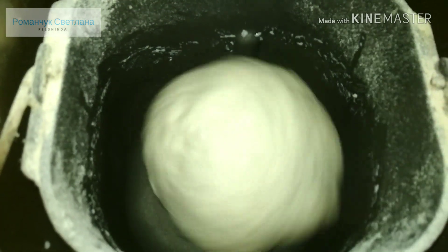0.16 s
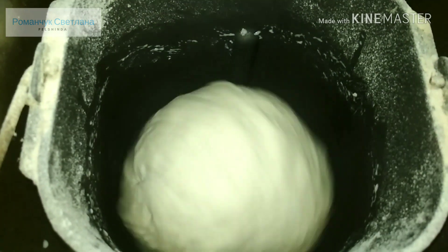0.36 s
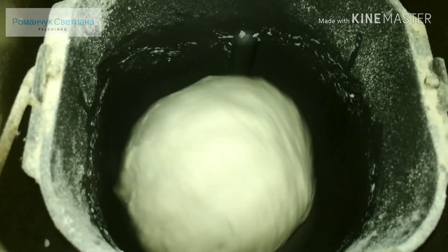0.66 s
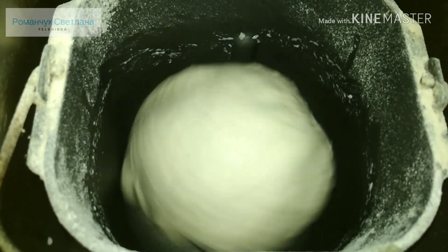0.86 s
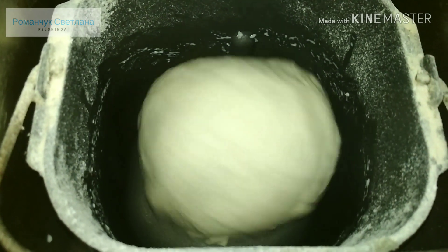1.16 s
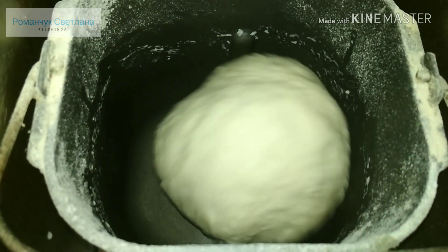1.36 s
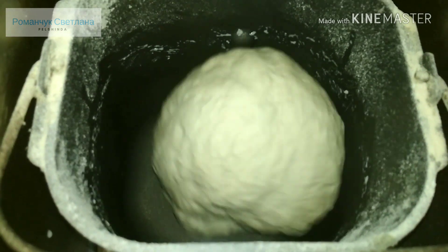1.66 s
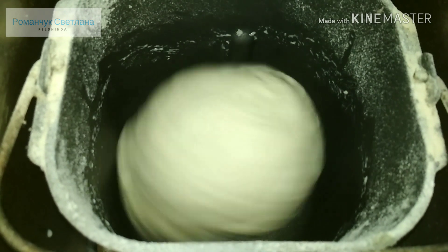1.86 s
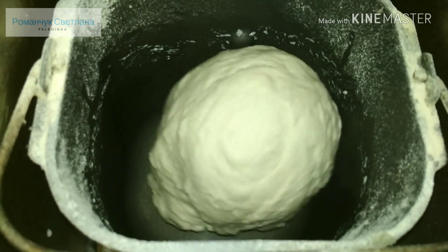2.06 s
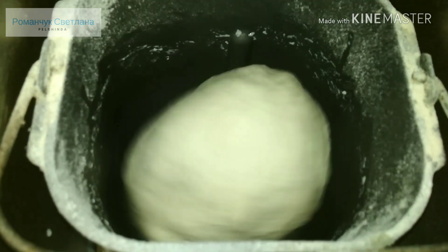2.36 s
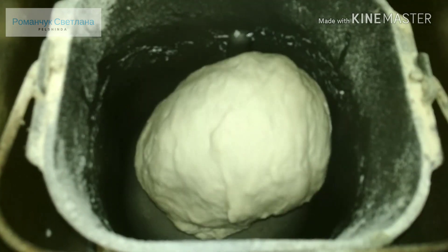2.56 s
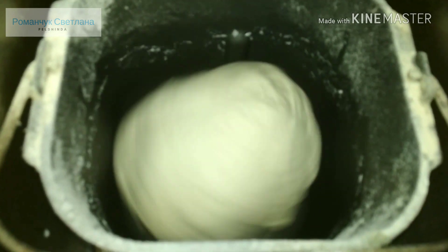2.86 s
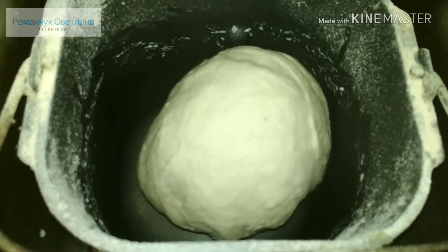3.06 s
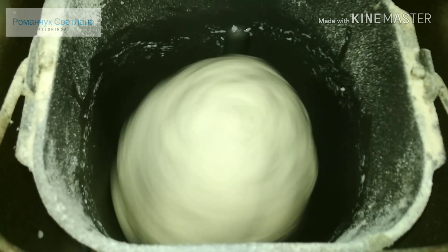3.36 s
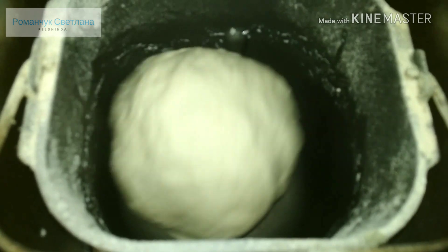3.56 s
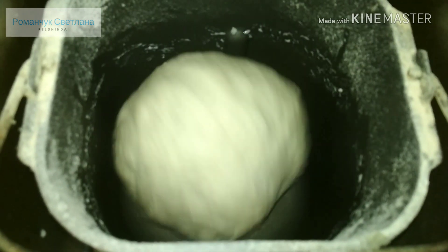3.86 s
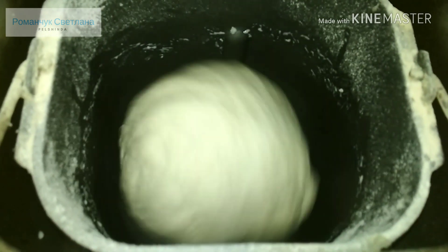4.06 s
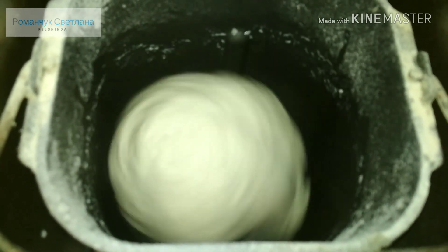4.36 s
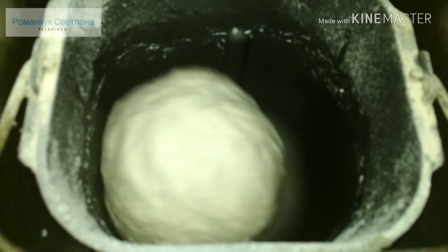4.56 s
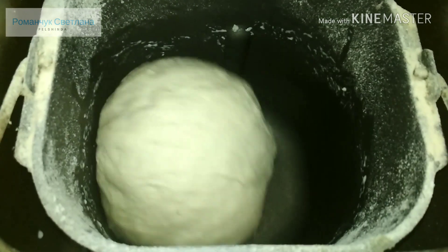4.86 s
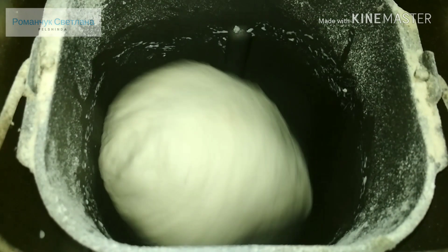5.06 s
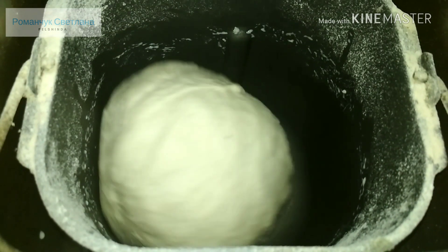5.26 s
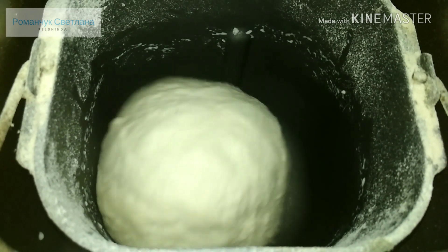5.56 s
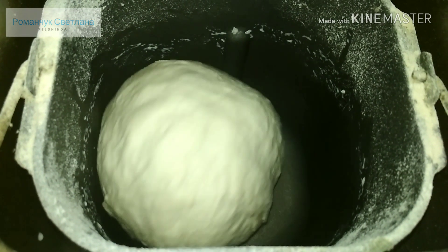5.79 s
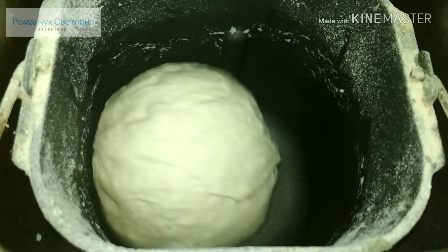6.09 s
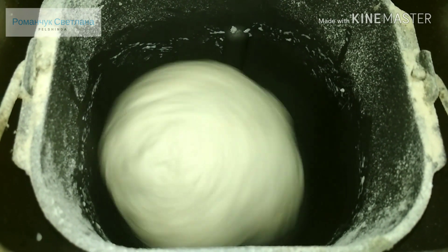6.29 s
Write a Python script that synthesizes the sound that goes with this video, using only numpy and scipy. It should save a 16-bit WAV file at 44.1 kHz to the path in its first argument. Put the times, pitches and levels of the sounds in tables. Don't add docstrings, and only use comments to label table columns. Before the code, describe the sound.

Close stereo microphones look down into a small metal pan. A motor hums low, swelling and sagging unevenly as the paddle loads it, while the casing rattles. Soft booming thuds, hollow knocks, gritty rubbing and sticky hiss follow the turning dough. Bright clicks burst out early and again midway; later the motor labours more regularly, with brief slips and small squelches.

```python
import sys
import numpy as np
from scipy import signal
from scipy.io import wavfile
from scipy.ndimage import uniform_filter1d

SR = 44100
rng = np.random.default_rng(int(sys.argv[2]) if len(sys.argv) > 2 else 0)


def generate_wav(signal):
    frames = np.transpose(np.atleast_2d(signal))
    scaled = np.clip(frames, -1, 1) * 32767
    pcm = np.round(scaled).astype(np.int16)
    wavfile.write(sys.argv[1], SR, pcm)


def convert_level_to_amplitude(level_db):
    exponent = np.asarray(level_db, float) / 20
    return 10 ** exponent


N = 283563
COARSE = 100
HUM_HZ = 100
SIDES = np.array([[1], [-1]])


def unit(x):
    return x / np.sqrt(np.mean(x ** 2) + 1e-20)


def at_hz(points, hz):
    point_hz, value = np.array(points)[:, 0], np.array(points)[:, 1]
    return np.interp(np.log(hz), np.log(np.maximum(point_hz, 1)), value)


def time_since(s):
    return np.arange(N // COARSE + 2)[:, None] * COARSE / SR - s


def at_samples(coarse):
    return np.interp(np.arange(N), np.arange(len(coarse)) * COARSE, coarse)


def drift(rate_hz):
    r = np.exp(-80 * np.pi * rate_hz / SR)
    noise = rng.standard_normal(N // 40 + 2002)
    slow = signal.lfilter([1], [1, -2 * r, r * r], noise)[2000:]
    return np.interp(np.arange(N) / 40, np.arange(len(slow)), unit(slow))


def resonance(x, hz, width_hz):
    r = np.exp(-np.pi * width_hz / SR)
    poles = [1, -2 * r * np.cos(2 * np.pi * hz / SR), r * r]
    return signal.lfilter(np.array([1, 0, -1]) * (1 - r * r) / 2, poles, x)


def bell(since, rise, linger):
    return np.exp(-.5 * (since / (rise * np.where(since < 0, 1, linger))) ** 2)


def contact_db(start, hold, db, rise_db, fall_db, rest_db):
    since = time_since(start)
    each = db - rise_db * np.maximum(-since, 0) - fall_db * np.maximum(since - hold, 0)
    return at_samples(10 * np.log10(np.sum(convert_level_to_amplitude(2 * each), axis=1) + convert_level_to_amplitude(2 * rest_db)))


def add(out, sound, s):
    i = round(s * SR)
    out[:, i:i + sound.shape[1]] += sound[:, :N - i]


def grains(per_s, spread_db):
    sizes = convert_level_to_amplitude(spread_db * np.minimum(rng.exponential(1, (2, 2, N)), 4))
    sizes = sizes * rng.standard_normal((2, 2, N))
    return unit(sizes * (rng.random((2, 2, N)) < per_s / SR))


# frequency in Hz, left over right in dB.
LEAN = [(60, 1), (200, .6), (400, -1.2), (1400, -2.5), (2800, 4.5), (5500, 3), (9000, -1.2), (15000, -2)]


def leaning(hz):
    return convert_level_to_amplitude(at_hz(LEAN, hz) / 2 * SIDES)


# frequency in Hz, left-right likeness (0 to 1).
LIKENESS = [(60, .9), (380, .96), (700, .85), (1300, .9), (2400, .55), (15000, .5)]


def coloured(source, spectrum, patchy_db, shared_db):
    out, together = 0, drift(23.0)[::COARSE]
    octaves = np.log2(spectrum[-1][0] / spectrum[0][0])
    edges = spectrum[0][0] * 2 ** np.arange(0, octaves + .01, 1 / 4)
    for k, (low, high) in enumerate(zip(edges, edges[1:])):
        hz, flicker = np.sqrt(low * high), drift(6.8)[::COARSE]
        band_db = at_hz(spectrum, hz)
        if band_db < -45:
            continue
        band = signal.butter(2, [low, high], "band", fs=SR, output="sos")
        mid, side = signal.sosfilt(band, source[k % 2])
        alike = at_hz(LIKENESS, hz)
        gain = at_samples(convert_level_to_amplitude(band_db + shared_db * together + patchy_db * flicker))
        pair = np.sqrt(1 + alike) * mid + np.sqrt(1 - alike) * side * SIDES
        out = out + gain * leaning(hz) * pair
    return unit(out)


# frequency in Hz, level in dB per Hz.
FLOOR = [(650, -56), (1100, -20), (1630, -2), (2060, -16), (5490, -21), (6720, -16.5), (7240, -5),
         (14000, -27.5)]


def drive_hiss():
    noise = rng.standard_normal((2, 2, N))
    return convert_level_to_amplitude(-67) * coloured(noise, FLOOR, patchy_db=0.1, shared_db=3.0)


# peak in seconds, rise in seconds, hum in dB, groan in dB.
LOAD = [(0.147, 0.042, -40, -71), (0.308, 0.044, -43, -32), (0.446, 0.041, -37.5, -68),
        (0.574, 0.033, -37, -33), (0.723, 0.028, -36, -42), (0.883, 0.041, -38.5, -33),
        (1.006, 0.036, -42, -62), (1.109, 0.07, -44.5, -42), (1.369, 0.058, -39, -44),
        (1.47, 0.036, -61, -69), (1.665, 0.051, -38.5, -48), (1.79, 0.055, -47, -35.5),
        (2.085, 0.046, -36.5, -43), (2.523, 0.043, -41, -37.5), (3.068, 0.033, -38, -66),
        (3.608, 0.044, -38, -34.5), (3.94, 0.054, -39.5, -34.5), (4.092, 0.051, -47, -60),
        (4.237, 0.039, -40.5, -33), (4.354, 0.035, -44, -57), (4.557, 0.042, -37, -31.5),
        (4.892, 0.041, -36, -32.5), (5.199, 0.034, -34.5, -31.5), (5.538, 0.035, -37, -32.5),
        (5.642, 0.018, -40, -71), (5.86, 0.051, -38.5, -31.5), (6.129, 0.042, -39, -32.5),
        (6.424, 0.011, -37, -69)]


def heaves():
    s, rise, hum_db, _ = np.transpose(LOAD)
    return np.sum(convert_level_to_amplitude(hum_db) * bell(time_since(s), rise, linger=1.46), axis=1)


# start in seconds, hold in seconds, housing rattle in dB, pan rub in dB.
KNEAD = [(0.04, 0.2, -46, -53.5), (0.316, 0.2, -47, -53.5), (0.586, 0.082, -44.5, -52.5),
         (0.717, 0.064, -41, -47.5), (0.86, 0.045, -48, -49), (0.99, 0.11, -45, -54),
         (1.272, 0.012, -45, -51.5), (1.334, 0.062, -43, -51), (1.606, 0.057, -45, -54),
         (1.722, 0.11, -45.5, -55.5), (1.964, 0.035, -46.5, -53), (2.096, 0.04, -43.5, -53),
         (2.419, 0.042, -48.5, -51.5), (2.527, 0.0068, -44, -52), (2.648, 0.014, -47, -62),
         (2.976, 0.18, -46, -53), (3.487, 0.1, -43.5, -51.5), (3.713, 0.008, -43, -53),
         (3.797, 0.085, -49.5, -52), (4.01, 0.18, -43.5, -53), (4.31, 0.0044, -46, -47.5),
         (4.347, 0.26, -49, -55.5), (4.713, 0.077, -44.5, -50.5), (4.843, 0.081, -44, -51.5),
         (5.033, 0.23, -43.5, -54), (5.42, 0.055, -44, -52), (5.513, 0.26, -47.5, -55),
         (5.814, 0.22, -49, -55.5), (6.14, 0.031, -48.5, -50.5), (6.292, 0.17, -46, -53)]


def rattle_level_db():
    start, hold, db, _ = np.transpose(KNEAD)
    return contact_db(start, hold, db, rise_db=98, fall_db=91, rest_db=-83)


# frequency in Hz, level in dB per Hz.
HOUSING = [(120, -34.5), (210, -2), (247, -17), (291, -12), (334, -14.5), (404, -7.5), (715, -28.5),
           (800, -18), (1040, -65), (1760, -120)]
UNDERTONE = [(26, -10), (38, -28), (55, -8), (78, -20), (125, 3), (170, -30), (200, -20)]


def rattle():
    shake = coloured(grains(900, 2.03), HOUSING, patchy_db=1.25, shared_db=0.9)
    deaf_above = signal.butter(6, 760, fs=SR, output="sos")
    shake = signal.sosfilt(deaf_above, shake)
    shake = shake * (1 + 0.12 * np.sin(2 * np.pi * HUM_HZ * np.arange(N) / SR))
    under = coloured(rng.standard_normal((2, 2, N)), UNDERTONE, patchy_db=1.5, shared_db=1.2)
    swing = (at_samples(heaves()) / convert_level_to_amplitude(-48.5) + .15) ** 0.63
    return convert_level_to_amplitude(rattle_level_db() + 1.98) * shake + convert_level_to_amplitude(-57) * swing * under


# time in seconds, level in dB.
PANEL = [
    (0.0, -46),
    (0.59, -48),
    (0.9, -42),
    (1.16, -56),
    (3.4, -111),
    (3.67, -64),
    (6.16, -102),
    (6.43, -39),
]


def panel():
    s, db = np.transpose(PANEL)
    hz, width_hz = 154.4, 7
    tone = resonance(rng.standard_normal(N), hz, width_hz)
    tone = unit(resonance(tone, hz, width_hz))
    return convert_level_to_amplitude(np.interp(np.arange(N) / SR, s, db)) * tone


# time in seconds, share of hum lost, frame buzz in dB.
SLIPS = [(1.26, 0.25, -56), (1.59, 0.51, -51.5), (1.75, .05, -54), (3.86, 0.4, -54), (4.44, 0.38, -60),
         (4.77, 0.61, -50.5), (5.09, 0.68, -53.5), (5.42, 0.57, -51), (5.73, 0.53, -52.5),
         (6.03, 0.17, -64), (6.34, 0.52, -54)]


def slips():
    s, lost, buzz_db = np.transpose(SLIPS)
    since = time_since(s)
    left = np.prod(1 - np.clip(lost, 0, 1) * bell(since, 0.029, 1.0), axis=1)
    buzz = np.sum(convert_level_to_amplitude(buzz_db) * bell(since, 0.064, 1.23), axis=1)
    cycles = np.cumsum(286 + 2.87 * drift(7.97)) / SR
    return at_samples(left), np.sqrt(2) * at_samples(buzz) * np.sin(2 * np.pi * cycles)


def second_order():
    s, rise, _, groan_db = np.transpose(LOAD)
    since = time_since(s)
    sag_hz, late_s = 3.74, 0.044
    sag = np.exp(1j * (4.61 - 2 * np.pi * sag_hz * since))
    swell = bell(since - late_s, rise * 1.3, linger=1.19)
    groan = np.sum(convert_level_to_amplitude(groan_db) * swell * sag, axis=1)
    loaded = convert_level_to_amplitude(-5.5) * heaves() * np.exp(-0.43j)
    return at_samples(convert_level_to_amplitude(-43) + loaded + groan) * convert_level_to_amplitude(.7 * drift(25))


# multiple of the hum, rms in dB, dB per dB of the rattle.
HUM_ORDERS = [(3, -51.5, -.4), (4, -87, 0.25), (6, -80, -1.1), (7, -67, 0.93), (13, -78, -0.25),
              (19, -85, 0.38)]


def motor():
    turn = 2 * np.pi * HUM_HZ * np.arange(N) / SR
    first_lead, second_lead = 0.21 * SIDES, 0.18 * SIDES
    heave = heaves()
    loaded = at_samples(heave - 0.042 * uniform_filter1d(heave, size=170))
    first = convert_level_to_amplitude(-49) * np.sin(turn + 0.28 + first_lead) + loaded * np.sin(turn + first_lead)
    second = np.real(second_order() * np.exp(1j * (2 * turn + second_lead)))
    left, buzz = slips()
    shaken_db = rattle_level_db() + 48
    orders = 0
    for k, db, follows in HUM_ORDERS:
        level = convert_level_to_amplitude(db + follows * shaken_db + 2.45 * drift(12.0))
        orders = orders + level * np.sin(k * turn + rng.uniform(0, 2 * np.pi))
    hum = np.sqrt(2) * (buzz + left * (first + second) + orders)
    return (hum + panel()) * convert_level_to_amplitude(0.42 * SIDES)


CAVITY_DB = 8
ECHO_SPAN = 6000


def cavity(x):
    out, t = np.zeros((2, N + 4 * ECHO_SPAN)), np.arange(2000) / SR
    padded = np.pad(x, ((0, 0), (ECHO_SPAN, ECHO_SPAN)))
    fade = np.hanning(2 * ECHO_SPAN + 1)[:-1]
    for i in range(0, N + ECHO_SPAN, ECHO_SPAN):
        echoes = rng.standard_normal((2, len(t))) * convert_level_to_amplitude(-60 * t / 0.07)
        echoes *= convert_level_to_amplitude(CAVITY_DB) / np.sqrt(np.sum(echoes ** 2, axis=1, keepdims=True))
        echoes[:, 0] = 1
        piece = padded[:, i:i + len(fade)]
        piece = signal.fftconvolve(piece * fade[:piece.shape[1]], echoes, axes=1)
        out[:, i:i + piece.shape[1]] += piece
    return out[:, ECHO_SPAN:ECHO_SPAN + N] / convert_level_to_amplitude(CAVITY_DB)


# frequency in Hz, width in Hz, level in dB.
PAN_MODES = [(1160, 89, -3), (1300, 78, -2.5), (1570, 11, -10), (1702, 55, -12), (1910, 38, -19),
             (2630, 130, -18.5), (4700, 32, -15)]


def pan_ring(x, widen):
    out = 0
    for k, (hz, width_hz, db) in enumerate(PAN_MODES):
        tilt = rng.normal(0, 1, (2, 1))
        out = out + convert_level_to_amplitude(db + tilt) * (-1) ** k * resonance(x, hz, width_hz * widen)
    return out


def above_pan_modes(x):
    return signal.sosfilt(signal.butter(6, 1020, "high", fs=SR, output="sos"), x)


# frequency in Hz, level in dB per Hz.
RUB = [(500, -39), (850, 10), (1180, -7.5), (1460, 0.5), (1930, -9), (2080, -3), (3200, -13), (4160, -56),
       (7040, -120)]


def rubbing():
    start, hold, _, db = np.transpose(KNEAD)
    rub_db = contact_db(start, hold, db, rise_db=200, fall_db=430, rest_db=-63.5)
    source = grains(1100, 2.24)
    rub = coloured(source, RUB, patchy_db=-3.0, shared_db=1.5)
    same_wall = source[0, :1] + .5 * source[1]
    ring = unit(pan_ring(same_wall, widen=0.53))
    wall = above_pan_modes(convert_level_to_amplitude(rub_db - 4.0) * ring)
    return wall + cavity(above_pan_modes(convert_level_to_amplitude(rub_db + 3.0) * rub))


# frequency in Hz, level in dB per Hz.
PEEL = [(1290, -41), (2200, -1.5), (3560, -4), (4300, -5), (4700, -3.5), (5540, -4.5), (6310, -3),
        (7250, -6), (11300, 0.5), (12500, 1.5), (16400, -13.5)]
# start in seconds, hold in seconds, hiss in dB.
STICK = [(0.019, 0.0051, -50.5), (0.188, 0.0, -49.5), (0.28, 0.027, -57), (0.48, 0.00034, -50.5),
         (0.62, 0.0072, -54), (0.88, 0.012, -55), (1.049, 0, -49.5), (1.114, 0.17, -57),
         (1.381, 0.025, -49.5), (1.562, 0.0019, -51), (1.7, 0, -48.5), (1.79, 0.33, -56.5), (1.957, 0, -55),
         (3.447, 0.1, -50.5), (3.697, 0.17, -52.5), (3.99, 0.011, -55), (4.116, 0.0032, -49.5),
         (4.278, 0.001, -52.5), (4.414, 0, -47.5), (4.55, 0.0042, -59), (4.678, 0.13, -50),
         (4.994, 0.12, -52), (5.207, 0.11, -58.5), (5.481, 0.091, -53), (5.672, 0.059, -50),
         (5.805, 0.056, -58.5), (5.94, 0.23, -54.5), (6.304, 0.007, -45.5)]
# start in seconds, hold in seconds, hiss in dB.
LANDINGS = [
    (0.7015, 0.037, -43),
    (2.354, 0.19, -52),
    (2.898, 0.23, -52.5),
    (3.381, 0.039, -56.5),
    (5.364, 0.047, -47),
]


def peeling():
    stick_db = contact_db(*np.transpose(STICK), rise_db=207, fall_db=120, rest_db=-73)
    landing_db = contact_db(*np.transpose(LANDINGS), rise_db=1600, fall_db=223, rest_db=-73)
    level = np.sqrt(convert_level_to_amplitude(2 * stick_db) + convert_level_to_amplitude(2 * landing_db))
    hiss = coloured(grains(6000, 1.2), PEEL, patchy_db=1.3, shared_db=1.3)
    return cavity(convert_level_to_amplitude(4.5) * level * hiss)


# time in seconds, peak in dB, boom in Hz.
THUMPS = [(0.1, -32.5, 414), (0.177, -40, 440), (0.298, -49, 439), (0.558, -32.5, 386), (0.77, -51, 415),
          (0.953, -50, 455), (0.989, -47, 398), (1.049, -38, 483), (1.253, -41, 358), (1.602, -37, 460),
          (1.775, -39, 384), (1.979, -34, 365), (2.361, -42, 426), (2.442, -40, 436), (2.514, -46, 463),
          (2.967, -34, 405), (3.028, -33, 420), (3.499, -33, 393), (3.541, -27, 417), (3.707, -35, 420),
          (3.99, -47, 420), (4.073, -26.5, 480), (4.158, -31.5, 400), (4.31, -30.5, 446), (4.582, -41, 382),
          (4.689, -31.5, 416), (4.77, -36, 420), (4.835, -27, 404), (5.101, -43, 431), (5.2, -35, 455),
          (5.4, -29, 417), (5.527, -27, 334), (5.584, -47, 382), (5.721, -27.5, 380), (5.809, -26, 390),
          (5.977, -40, 445), (6.131, -30.5, 444), (6.223, -46, 400), (6.281, -29.5, 476),
          (6.384, -27.5, 367)]


def thumps():
    out, t = np.zeros((2, N)), np.arange(3000) / SR / 0.0085
    width_hz = 162
    for s, db, hz in THUMPS:
        push = rng.standard_normal((1, len(t))) * t * np.exp(-2 * t)
        boom = resonance(resonance(push, hz, width_hz), hz, width_hz)
        add(out, convert_level_to_amplitude(db - 4.0) * boom / abs(boom).max(), s)
    return out


def strikes(rows, click_db):
    out, t = np.zeros((2, N)), np.arange(3000) / SR
    dull = signal.butter(4, 4800, fs=SR, output="sos")
    for s, db, hz in rows:
        rough = rng.standard_normal((2, len(t))) * np.exp(-t / .0035)
        contact = 4.0 * (t < 1 / SR) + 0.46 * rough
        ring = resonance(resonance(contact, hz, hz / 24), hz, hz / 11)
        click = signal.sosfilt(dull, resonance(rough, 1000, 3400))
        thud = resonance(rough[:1], rng.uniform(180, 730), 89)
        parts = ring / abs(ring).max()
        parts = parts + convert_level_to_amplitude(click_db) * click / abs(click).max()
        parts = parts + convert_level_to_amplitude(0.5) * thud / abs(thud).max()
        add(out, convert_level_to_amplitude(db - 8.0) * leaning(hz) * parts, s)
    return out


# time in seconds, peak in dB, loudest ring in Hz.
KNOCKS = [(0.0533, -40, 1190), (0.0987, -50, 1260), (0.2928, -42, 1270), (0.5705, -41, 1390),
          (0.6316, -43, 1360), (1.0021, -36, 1150), (1.603, -48, 1260), (2.528, -32.5, 1160),
          (3.43, -39, 957), (3.703, -41, 1300), (4.014, -38, 1230), (4.7698, -38, 1260), (5.106, -36, 1290),
          (5.44, -39, 1300), (5.586, -35, 1230), (5.9359, -57, 1105), (6.084, -42, 1120),
          (0.3462, -34.5, 1290), (0.4833, -36, 1304), (0.65, -36, 1260), (0.9902, -35, 1160),
          (1.094, -39, 1210), (1.2503, -37, 1370), (1.312, -50, 1200), (2.388, -33.5, 1300),
          (2.4424, -40, 1180), (2.5115, -34.5, 1300), (3.0516, -33, 1300), (3.1227, -30.5, 1324),
          (3.719, -43, 1160), (3.924, -33.5, 1180), (4.14, -37, 1270), (4.3067, -32, 1215),
          (4.364, -38, 1120), (4.3897, -31, 1140), (4.4535, -34, 1260), (4.561, -37.5, 1370),
          (4.7409, -46, 1260), (4.8354, -35.5, 1190), (5.029, -42, 1125), (5.386, -27.5, 1317),
          (5.5417, -33, 1160), (5.977, -52, 1180), (6.1302, -40, 1160), (6.3413, -36, 1160)]


def knocks():
    return strikes(KNOCKS, click_db=0.0)


# time in seconds, peak in dB, loudest ring in Hz.
RAPS = [(0.575, -43, 2980), (0.704, -27.5, 1910), (0.7415, -25, 1800), (1.045, -36.5, 1660),
        (1.181, -44, 1730), (1.604, -56, 1210), (1.8167, -35, 1990), (2.363, -40, 1730),
        (2.6533, -33.5, 1760), (3.328, -44, 1300), (3.3925, -58, 2180), (4.077, -38, 2940),
        (4.5185, -37, 1570), (4.644, -40.5, 1570), (4.9072, -37, 1570), (5.201, -38.5, 1503),
        (5.8084, -34, 2530), (5.8796, -32, 1570)]


def raps():
    return strikes(RAPS, click_db=3)


# time in seconds, length in seconds, level in dB, ring in Hz.
AFTER_RINGS = [
    (0.734, 0.044, -38, 1930),
    (0.82, 0.007, -56, 2500),
    (3.493, 0.033, -44, 3070),
    (3.542, 0.067, -47, 1720),
    (0.7, 0.024, -43, 4770),
    (3.49, 0.014, -46, 4700),
]


def after_rings():
    out = np.zeros((2, N))
    for s, length, db, hz in AFTER_RINGS:
        t = np.arange(6000) / SR / length
        tone = unit(resonance(rng.standard_normal((2, len(t))), hz, hz / 24))
        add(out, convert_level_to_amplitude(db) * tone * 2.3 * t * np.exp(-2 * t), s)
    return out


# time in seconds, peak in dB, lower part in dB relative to it.
TICKS = [(0.311, -39.5, 3), (0.572, -45, 14), (0.686, -30, -12), (0.701, -27, 4), (0.726, -35, 9),
         (0.732, -31, -2), (1.579, -40, -4), (1.6016, -37, 4.5), (2.1284, -50, 15), (2.3633, -32.5, -4.5),
         (3.121, -40, -2), (3.3925, -32.5, -2), (3.481, -46, 15), (3.492, -33, 4), (3.503, -36.5, 7.5),
         (3.576, -46, 10), (3.593, -37, 4), (4.63, -38, -21), (4.673, -41, -11), (5.0925, -35.5, 3.5),
         (5.128, -34, -22), (5.3837, -37, -35)]


def ticks():
    out, t = np.zeros((2, N)), np.arange(5000) / SR
    bright = signal.butter(2, [5500, 14000], "band", fs=SR, output="sos")
    lower = signal.butter(2, [1700, 5200], "band", fs=SR, output="sos")
    rise = np.minimum(t / 0.00125, 1) ** 2
    envelope = (1.05 * np.exp(-t / 0.005) + convert_level_to_amplitude(-60 * t / 0.13)) * rise   # snap, then tail of T60 0.13 s
    for s, db, lower_db in TICKS:
        burst = rng.standard_normal((2, len(t))) * envelope
        burst[1] = 0.032 * burst[0] + 0.89 * burst[1]
        high = signal.sosfilt(bright, burst)
        for gain, hz, width_hz in ((0.25, 10500, 1800), (0.77, 3800, 200), (0.5, 10900, 280)):
            high = high + gain * resonance(burst, hz, width_hz)
        low = 2.0 * signal.sosfilt(lower, burst)
        for hz in (1970, 2550, 3480, 4720):
            low = low + 1.4 * resonance(burst, hz, 140)
        parts = high / abs(high).max() + convert_level_to_amplitude(lower_db - 5.0) * low / abs(low).max()
        add(out, convert_level_to_amplitude(db + 4.5) * parts, s)
    return out


def puffs(rows):
    out, t = np.zeros((2, N)), np.arange(4000) / SR
    sharpness = 14.6
    for s, db, hz, t60 in rows:
        envelope = np.minimum(t / 0.00049, 1) * convert_level_to_amplitude(-60 * t / t60)
        puff = rng.standard_normal((2, len(t))) * envelope
        puff[:, 1] += 3.3
        puff = puff + 0.12 * puff[::-1]
        puff = resonance(resonance(puff, hz, hz / sharpness), hz, 2 * hz / sharpness)
        add(out, convert_level_to_amplitude(db) * leaning(hz) * puff / abs(puff).max(), s)
    return out


# time in seconds, peak in dB, centre in Hz, T60 in seconds.
SNAPS = [(0.3117, -40.5, 4700, 0.066), (0.686, -34.5, 4760, 0.043), (0.686, -47, 11400, .04),
         (0.7, -30, 11500, 0.028), (0.7045, -30, 9900, 0.025), (0.719, -34, 4800, 0.05),
         (0.727, -32, 4720, 0.046), (0.734, -33, 4750, 0.09), (0.736, -26.5, 9600, 0.024),
         (0.74, -25, 3630, 0.061), (0.7255, -52, 11500, .05), (0.7345, -45, 11800, .04),
         (0.742, -33, 2330, 0.042), (0.758, -42, 1900, 0.088), (1.004, -40, 1610, 0.036),
         (1.314, -41, 2700, 0.029), (4.31, -39, 1560, 0.092), (4.52, -42, 2520, .05),
         (0.718, -32, 2500, 0.058), (0.703, -28, 6400, 0.054), (0.734, -31.5, 6460, 0.055),
         (4.078, -45, 2930, 0.043), (0.9893, -39.5, 2580, 0.077), (1.5804, -36, 12000, .02),
         (1.581, -50, 2420, .03), (1.602, -45, 12200, 0.045), (1.704, -40, 11400, .03),
         (1.8257, -39.5, 6480, 0.094), (2.128, -41.5, 2740, 0.17), (2.128, -41, 1590, 0.044),
         (2.3648, -25.5, 11400, 0.012), (2.9014, -53, 10000, .03), (3.3276, -46, 1680, 0.039),
         (2.6532, -50.5, 3100, 0.027), (3.3942, -40, 7800, 0.024), (3.482, -38, 4700, .06),
         (3.491, -37, 2730, 0.07), (3.502, -32, 4750, 0.066), (3.502, -38, 2030, 0.12),
         (3.502, -36, 6300, .04), (3.542, -38, 1970, 0.065), (3.557, -38, 1970, 0.16),
         (3.563, -48, 4800, .06), (3.574, -38, 2410, 0.11), (3.591, -40, 4700, 0.051),
         (3.6, -48, 1720, 0.13), (4.2682, -39.5, 11300, 0.036), (4.6344, -50, 11000, .03),
         (5.367, -41.5, 3500, 0.11), (5.386, -42, 4060, 0.035), (5.386, -43, 2320, 0.045)]


def snaps():
    return puffs(SNAPS)


# time in seconds, peak in dB, centre in Hz, T60 in seconds.
MORE_SNAPS = [
    (4.741, -40, 1900, .03),
    (4.772, -38.5, 2270, .05),
    (4.838, -37, 2490, 0.043),
    (5.63, -43.5, 2360, 0.1),
    (5.978, -47, 2400, 0.024),
    (6.131, -41.5, 1630, 0.095),
]


def more_snaps():
    return puffs(MORE_SNAPS)


def scene():
    whole = drive_hiss() + rattle() + motor() + rubbing() + peeling() + thumps()
    whole = whole + knocks() + raps() + after_rings() + ticks() + snaps() + more_snaps()
    return whole - 0.55 * resonance(whole, 815, 110)


# frequency in Hz, share of time lost.
DROPOUTS = [(700, 0), (830, .25), (1000, .03), (1800, .02), (2100, .2), (2400, .06), (3200, .08),
            (3750, .33), (4250, .33), (4700, .06), (5650, .36), (6200, .14), (7600, .14), (10500, .04),
            (12600, .08), (13200, .38), (15500, .55)]
# frequency in Hz, strength of the attraction.
QUIET_LOSES = [(700, .1), (1200, .2), (3000, .01), (12000, .2), (13000, .4)]


def dropouts(x):
    hz, _, z = signal.stft(x, SR, nperseg=2048, noverlap=1536)
    frames = z.shape[2]
    chance = uniform_filter1d(rng.standard_normal((len(hz) // 8 + 1, frames)), size=8, axis=1)
    loudness = np.log(np.sum(abs(z[:, hz > 6000]) ** 2, axis=(0, 1)) + 1e-12)
    loudness = np.clip(unit(loudness - loudness.mean()) + .6, -2, .2)
    chance = chance + at_hz(QUIET_LOSES, hz[::8] + 1)[:, None] * loudness
    rank = (chance.argsort(axis=1).argsort(axis=1) + 1) / frames
    lost = rank < at_hz(DROPOUTS, hz[::8] + 80)[:, None]
    lost = np.repeat(lost, 8, axis=0)[:len(hz)]
    kept = z * np.where(lost, convert_level_to_amplitude(-30), 1)
    return signal.istft(kept, SR, nperseg=2048, noverlap=1536)[1][:, :N]


def roll_off(x):
    return signal.sosfilt(signal.butter(12, 16470, fs=SR, output="sos"), x)


def record(dry):
    top_cut = signal.cheby2(12, 45, 15900, fs=SR, output="sos")
    mix = signal.sosfilt(top_cut, dropouts(dry))
    return roll_off(mix)


dry = scene()
out = record(dry)
generate_wav(out)
```